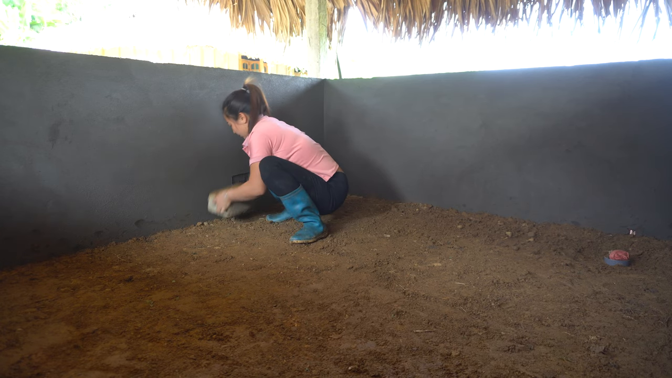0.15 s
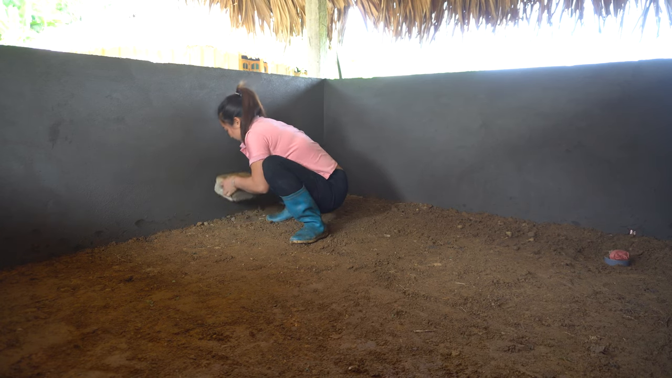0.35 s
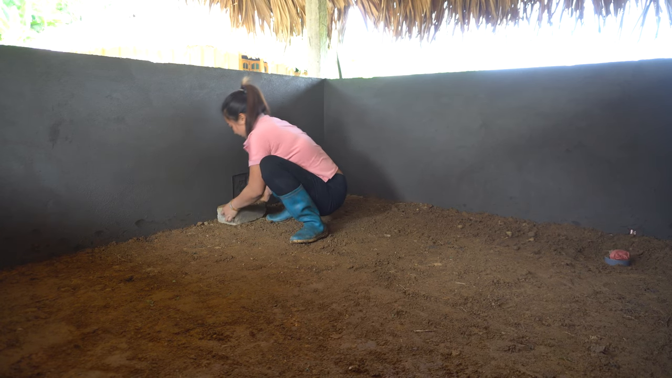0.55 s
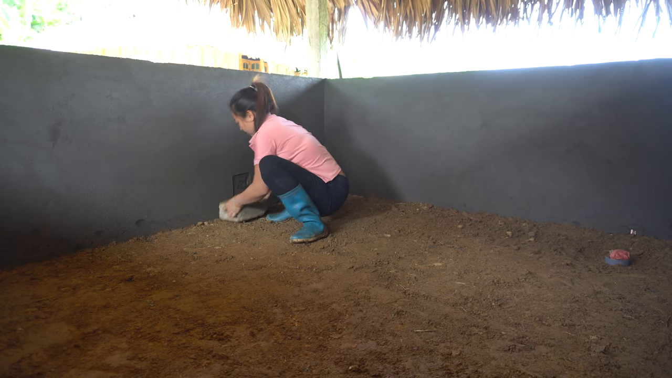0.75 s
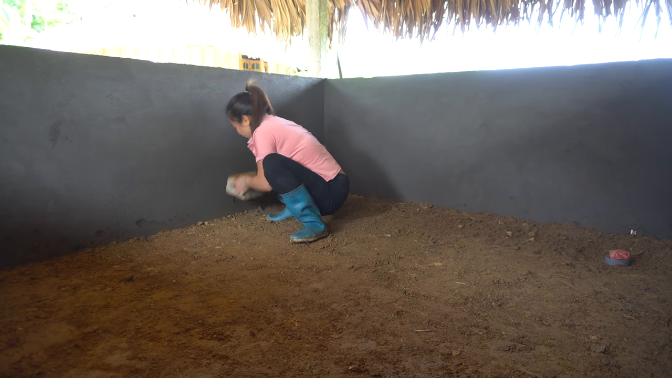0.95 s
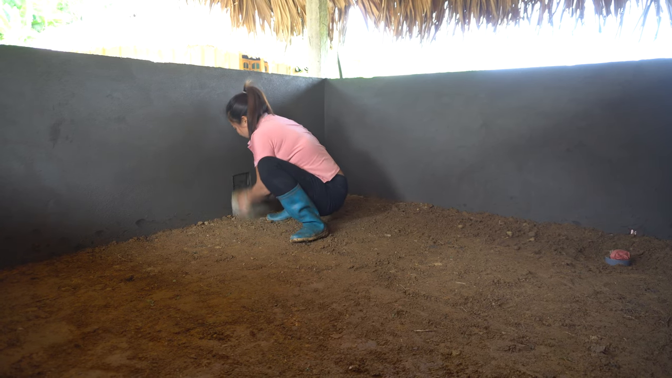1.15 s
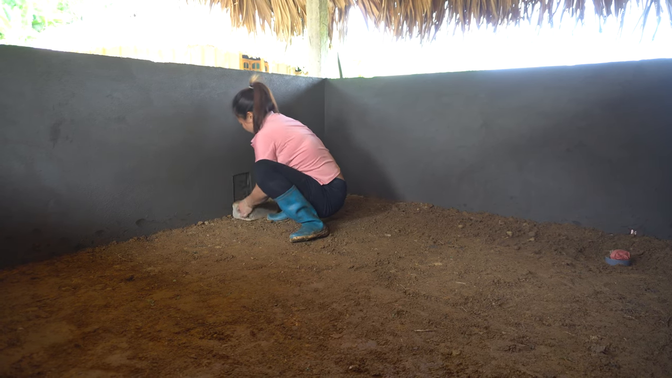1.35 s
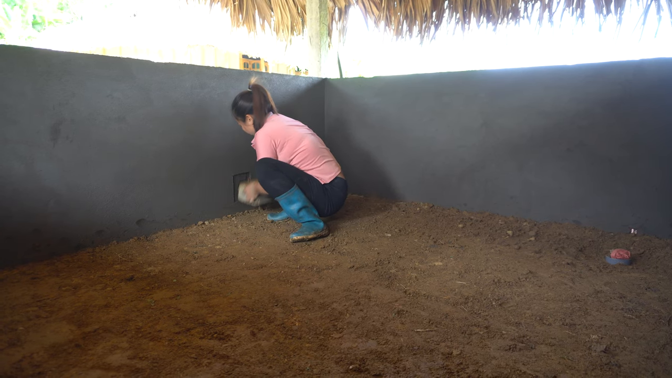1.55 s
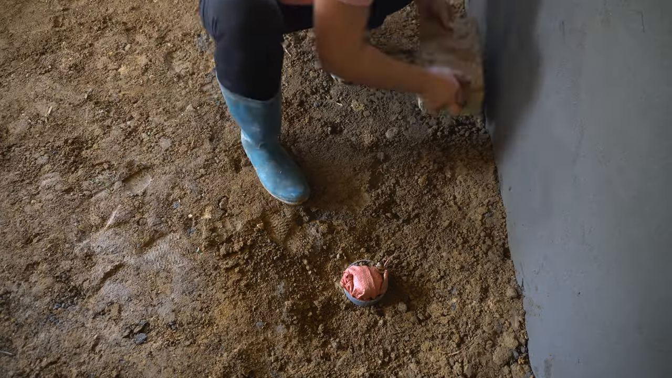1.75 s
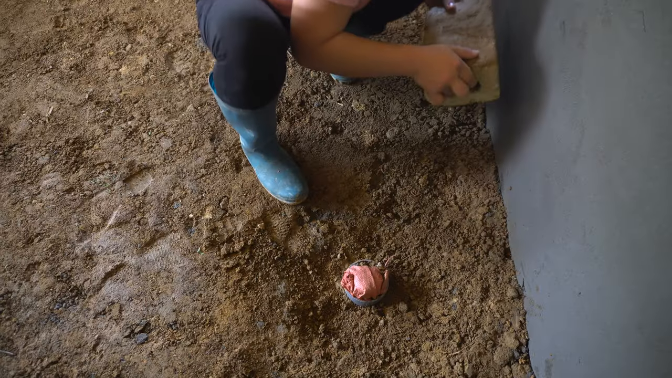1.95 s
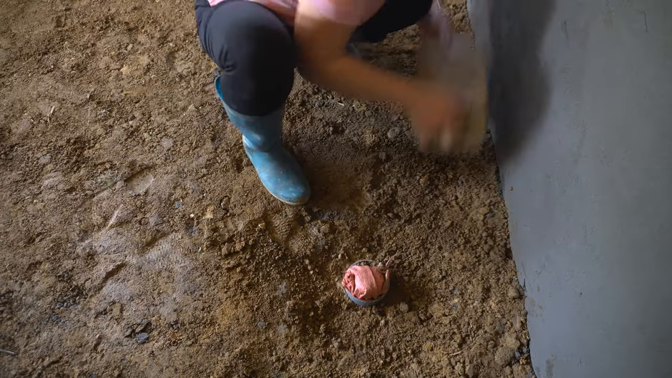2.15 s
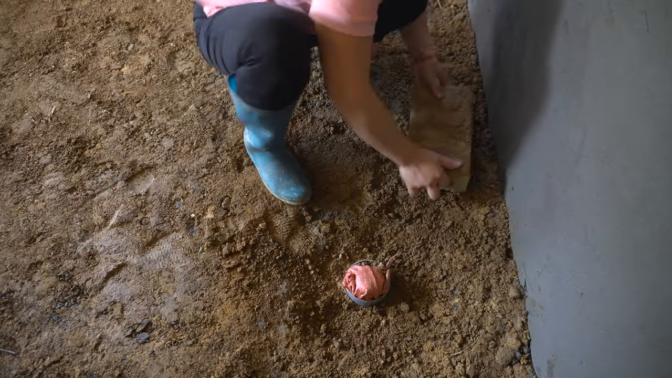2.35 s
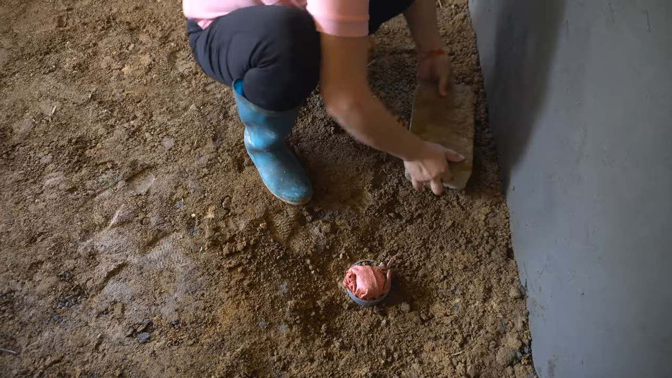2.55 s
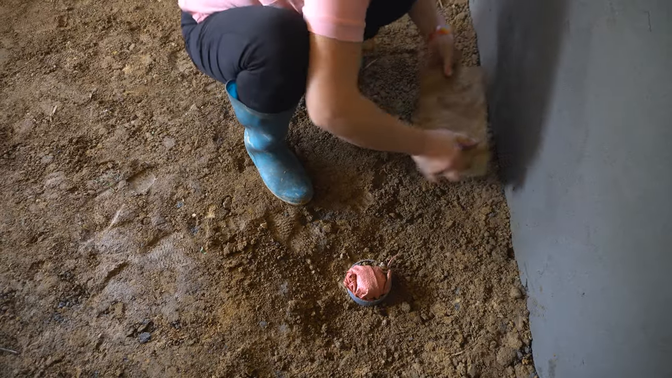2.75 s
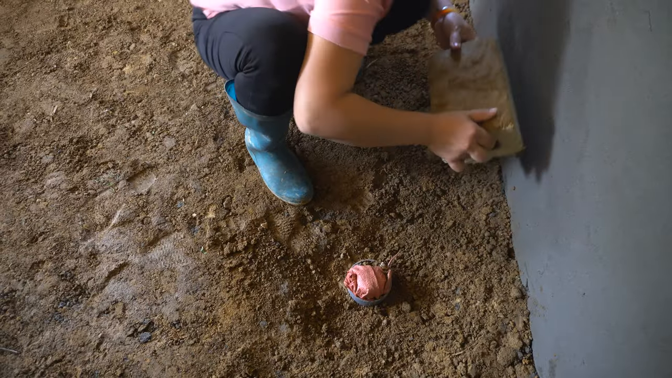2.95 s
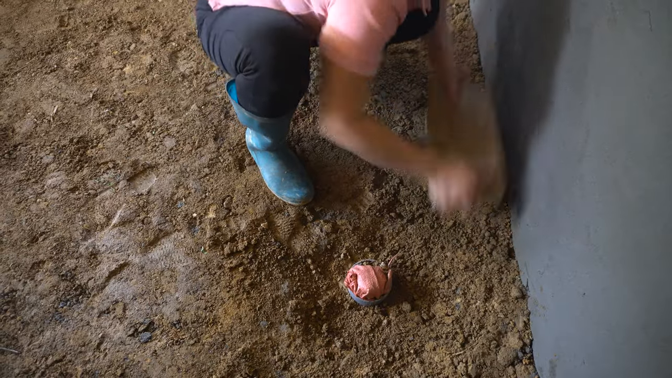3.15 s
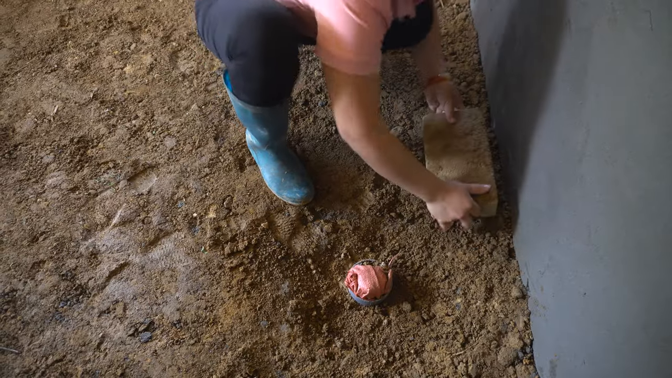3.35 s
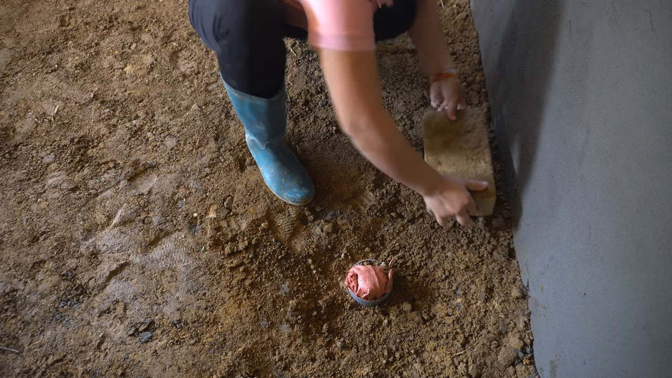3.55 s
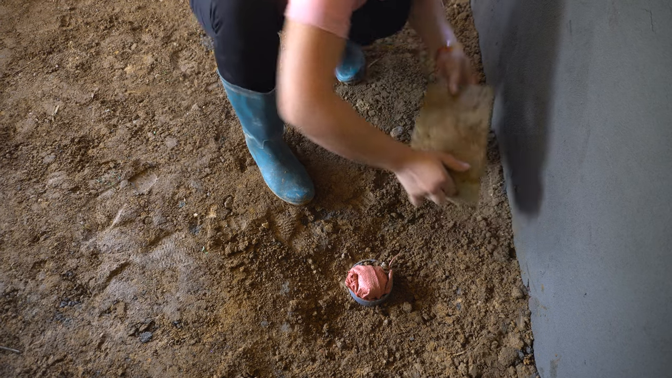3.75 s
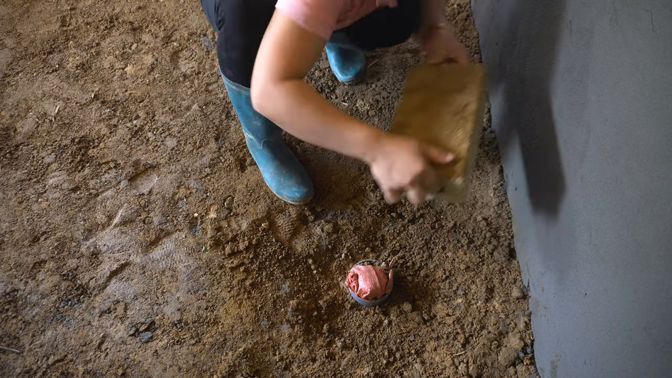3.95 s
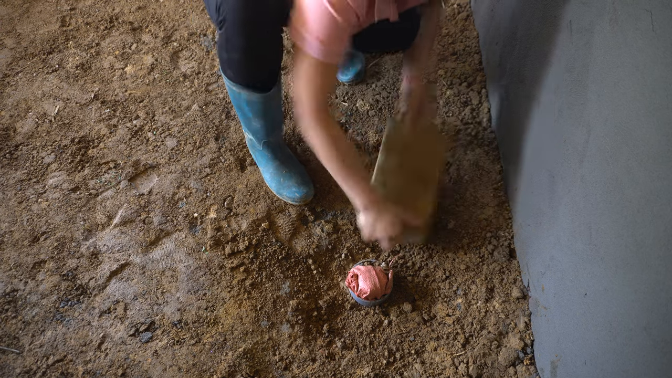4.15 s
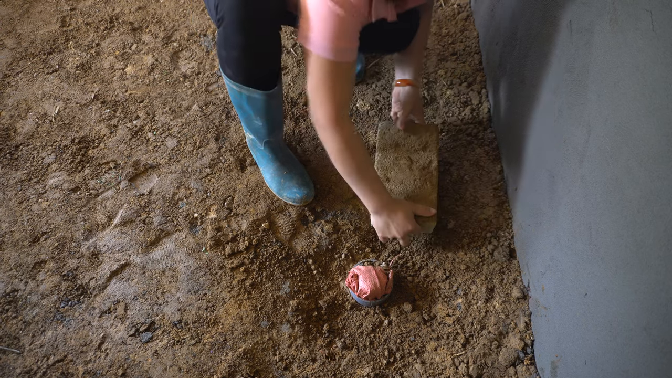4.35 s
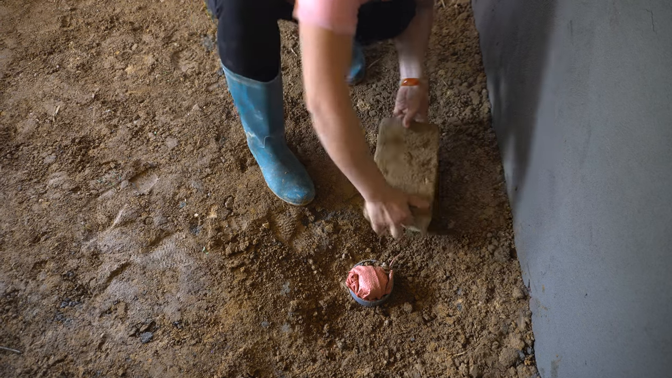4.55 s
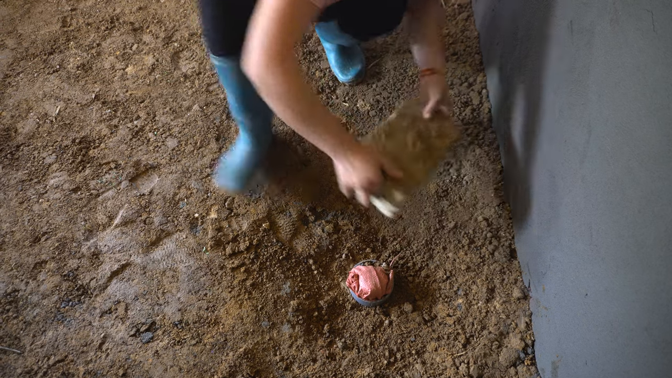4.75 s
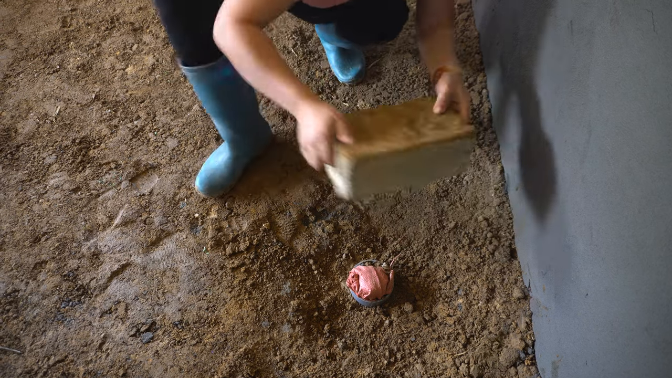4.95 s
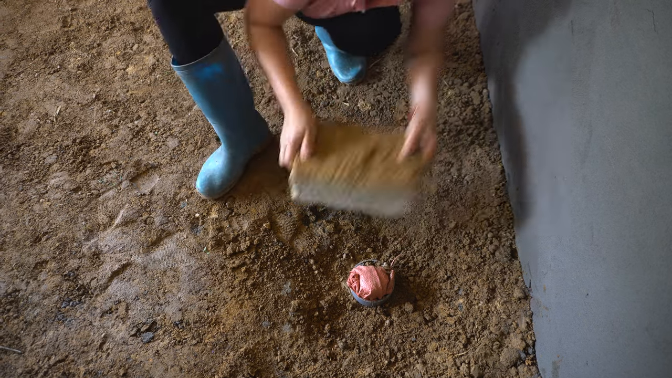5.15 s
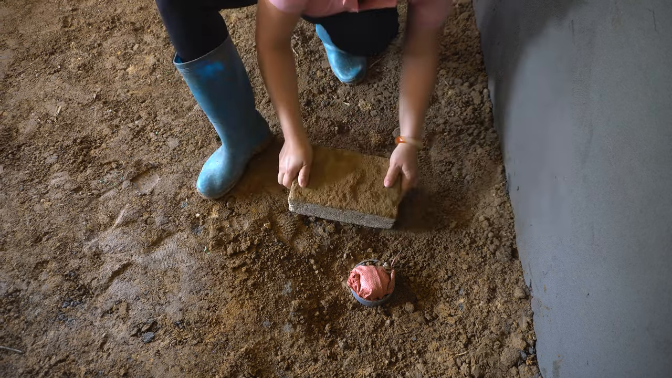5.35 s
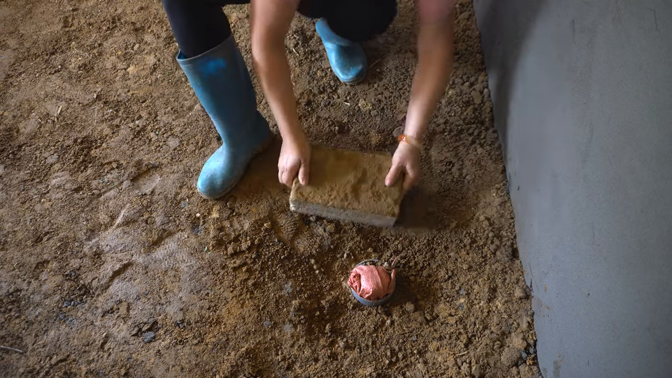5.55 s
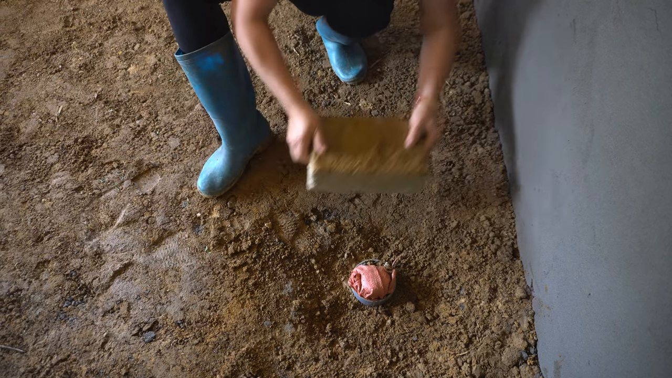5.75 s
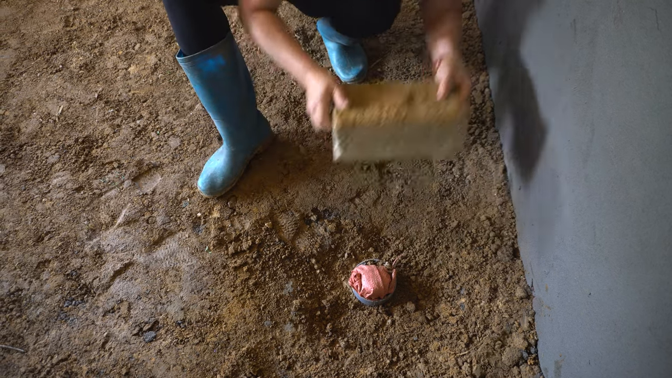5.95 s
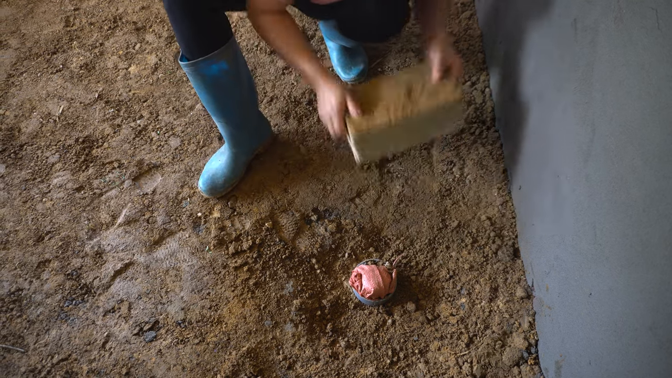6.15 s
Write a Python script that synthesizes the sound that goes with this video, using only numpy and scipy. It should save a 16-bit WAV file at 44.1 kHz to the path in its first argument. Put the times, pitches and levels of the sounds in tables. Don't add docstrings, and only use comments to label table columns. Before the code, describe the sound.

Slow, steady thumps of a brick on loose soil: two from farther off, with a strong low boom, then a split-second dropout and four heard closer, with knocks, crushed grit and short hollow ringing. Crumbs and earth rustle between blows. Quiet outdoor hiss, thin insect chirps and faint bird notes lie behind, with low wind gusts bumping the stereo microphone.

```python
import sys
import numpy as np
from scipy import signal
from scipy.fft import rfft, irfft, next_fast_len
from scipy.io import wavfile
from scipy.ndimage import uniform_filter1d

SR = 44100
rng = np.random.default_rng(int(sys.argv[2]) if len(sys.argv) > 2 else 0)


def pcm_store(signal):
    levels = np.round(np.clip(np.atleast_2d(signal), -1, 1) * 32767)
    wavfile.write(sys.argv[1], SR, levels.astype(np.int16).T)


def decibels_to_gain(level_db):
    exponent = np.asarray(level_db, float) / 20
    return 10 ** exponent


N = 277367


def evened(x):
    return x / np.sqrt(np.mean(x ** 2) + 1e-20)


def read(points, hz):
    f, value = np.transpose(points)
    return np.interp(np.log(hz + 1), np.log(f + 1), value)


def add(mix, s, sound):
    part = mix[..., round(s * SR):][..., :sound.shape[-1]]
    part += sound[..., :part.shape[-1]]


def band(x, lo_hz, hi_hz, order=2):
    return signal.sosfilt(signal.butter(order, [lo_hz, hi_hz], "band", fs=SR, output="sos"), x)


def panned(x, db):
    return x * decibels_to_gain(np.array([[db / 2], [-db / 2]]))


def swells(rows, column, skew, power):
    t, energy = np.arange(N) / SR, np.zeros(N)
    for row in rows:
        u = np.clip((t - row[0]) / row[1], 0, 1)
        arch = abs(np.sin(np.pi * u ** skew)) ** power
        energy += (decibels_to_gain(row[column]) * arch) ** 2 * (u < 1)
    return np.sqrt(energy)


def noise(spectrum, same, patchy_db):
    frames, hz = N // 256 + 5, np.fft.rfftfreq(1024, 1 / SR)
    a, b, c, d, patches = rng.standard_normal((frames, 513, 5)).T
    patches = uniform_filter1d(patches, size=10, axis=0)
    patches = evened(uniform_filter1d(patches, size=12, axis=1))
    like = np.clip(same(hz), 0, 1)[:, None]
    left = a + 1j * b
    right = like * left + np.sqrt(1 - like ** 2) * (c + 1j * d)
    gain = decibels_to_gain(read(spectrum, hz)[:, None] + patchy_db * patches)
    return signal.istft(np.array([left, right]) * gain, nperseg=1024, noverlap=768)[1][:, :N]


# start_s, end_s
CUT = (1.788, 1.8285)
SILENCE_START_S, SILENCE_END_S = CUT


def by_place(far, near):
    return np.where(np.arange(N) < SILENCE_END_S * SR, far, near)


# freq_hz, density_db
AIR_FAR = [(15, -23), (25, 2), (48, -7.5), (123, 2), (175, -15.5), (277, -11.5), (427, -17.5), (840, -14),
           (1040, -21), (1260, -17), (3620, -18), (12500, -29), (16000, -38)]
AIR_NEAR = [(15, -41), (25, 14), (59, -7.5), (108, 7), (190, -8.5), (263, -0.5), (416, -8), (575, -5),
            (936, -9.5), (2690, -12.5), (12900, -24.5), (14800, -27), (16000, -32)]
# freq_hz, likeness (0 to 1)
AIR_LIKENESS = [(60, 1), (150, 0.94), (380, 0.65), (950, 0.37), (2380, 0.45), (5980, 0.019), (15000, 0.19)]


def air():
    places = []
    for spectrum, level_db in (AIR_FAR, -54.5), (AIR_NEAR, -55):
        wash = noise(spectrum, lambda hz: read(AIR_LIKENESS, hz), patchy_db=-2.0)
        places.append(decibels_to_gain(level_db) * wash / band(wash, 300, 16000).std())
    return by_place(*places)


# freq_hz, density_db
WIND = [(12, -37), (20, -19), (54, 19), (103, 3), (173, -4.5), (240, -9.5), (410, -39), (700, -54),
        (910, -85), (1540, -120)]
# start_s, length_s, level_db
GUSTS = [(-.05, 0.18, -49), (.245, 0.23, -36), (.445, 0.11, -38), (.77, 0.25, -36.5), (1., 0.35, -59),
         (1.4, 0.33, -50), (1.64, 0.16, -44.5), (3.4, 0.4, -51), (3.89, 0.064, -49), (4.5, 0.45, -50),
         (4.9, 0.077, -27.5), (4.97, 0.13, -22.5), (5.08, 0.13, -18.5), (5.19, 0.25, -29.5),
         (5.4, 0.18, -47), (5.54, 0.085, -40), (5.6, 0.23, -45.5), (5.84, 0.12, -42), (6.1, 0.2, -38.5),
         (6.16, 0.15, -28.5), (6.26, 0.22, -23.5)]
# start_s, peak_db, pitch_hz, left_minus_right_db
EDDIES = [(0.388, -29.5, 79.4, -6), (0.468, -34, 70.5, -8), (4.899, -23, 96, -4), (4.992, -24, 152, -1),
          (5.014, -23, 102, -1), (5.026, -21, 249, 1), (4.933, -32, 79.4, -10), (5.035, -25.5, 105, 2),
          (5.073, -28.5, 148, -3), (5.107, -20, 116, -2), (5.124, -34, 151, 0), (5.096, -25.5, 240, 4),
          (5.068, -38, 350, 0), (5.132, -26, 248, 0), (5.162, -23.5, 190, 4), (5.141, -18.5, 111, 3),
          (5.159, -18, 87.6, -5), (5.247, -36, 73, -1), (5.557, -31.5, 150, 6.5), (6.196, -21, 73, -5),
          (6.233, -24, 95, 2)]


def wind():
    rumble = noise(WIND, lambda hz: 1 - (hz / 260) ** 2.0, patchy_db=-1.0)
    rumble = band(rumble, 43.4, 950, order=3)
    lumps = np.tanh(evened(band(rng.standard_normal(N), 9.4, 53)))
    gusts = swells(GUSTS, -1, skew=0.7, power=0.93)
    out = evened(rumble * decibels_to_gain(4.3 * lumps)) * gusts * decibels_to_gain(-6.0)
    crest = 0.17
    for s, db, hz, pan_db in EDDIES:
        turns = np.arange(0, 2.4, hz / SR)
        eddy = -np.sin(2 * np.pi * turns) * np.sin(np.pi * turns / 2.4) ** 2
        eddy = eddy * (1 - crest + crest * abs(eddy) ** 3)
        add(out, s - .004, panned(decibels_to_gain(db) * eddy, pan_db))
        slope = np.gradient(eddy)
        add(out, s, decibels_to_gain(db - 9.5) * np.outer([1, -1], slope / slope.max()))
    return out


def chirps(trills, count, strokes, gain_db, climb_hz, sag):
    out, t = np.zeros(N), np.arange(0, count / strokes, 1 / SR)
    stroke, within = np.divmod(t * strokes, 1)
    before = count - 1 - stroke
    for s, end, db, hz, rate in trills:
        pitch = (hz - climb_hz * before) * (1 + sag * (.5 - within))
        for start in np.arange(s, end - .03, 1 / rate):
            chance = rng.standard_normal(8)
            uneven_db = 1.2 * chance[stroke.astype(int)] + 1.1 * chance[-1]
            turns = np.cumsum(pitch * (1 + .004 * chance[-2])) / SR
            wing = np.sin(np.pi * within) ** 1.8 * np.sin(2 * np.pi * turns)
            add(out, start, decibels_to_gain(db - gain_db * before + uneven_db) * wing)
    return out


# strokes_per_chirp, strokes_per_s, gain_per_stroke_db, climb_per_stroke_hz, sag_share
HIGH_WING = (3, 66, 5, 70, .07)
LOW_WING = (1, 20, 0, 0, -.008)
# start_s, end_s, level_db, pitch_hz, chirps_per_s
HIGH_TRILLS = [(1.877, 2.07, -56, 4890, 23.), (2.847, 3.41, -57.5, 4890, 22.3),
               (3.841, 4.51, -57.5, 4890, 21.8), (5.072, 5.54, -57, 4870, 22.2),
               (6.08, 6.29, -56, 4800, 22.)]
LOW_TRILLS = [(.01, .08, -56, 4200, 17.), (1.004, 1.4, -57.5, 4190, 17.2), (3.218, 3.56, -59.5, 4170, 18.),
              (4.632, 4.96, -58, 4150, 17.), (5.93, 6.26, -58, 4150, 17.)]


def crickets():
    return chirps(HIGH_TRILLS, *HIGH_WING) + chirps(LOW_TRILLS, *LOW_WING)


def glides(notes, blur):
    out, wobble = np.zeros(N), evened(band(rng.standard_normal(N), 40, 300))
    for s, end, start_hz, end_hz, db in notes:
        t = np.arange(s, end, 1 / SR)
        hz = np.linspace(start_hz, end_hz, len(t)) * (1 + blur * wobble[round(s * SR):][:len(t)])
        tone = np.sin(2 * np.pi * np.cumsum(hz) / SR)
        add(out, s, decibels_to_gain(db - 1.0) * tone * signal.windows.tukey(len(t), .4))
    return out


# start_s, end_s, start_hz, end_hz, level_db
WHISTLES = [
    (1.826, 1.885, 4250, 4650, -53),
    (4.16, 4.245, 3850, 4500, -54),
    (4.0, 4.1, 2550, 2900, -62),
    (.52, .615, 5950, 5880, -58),
]
COOS = [
    (2.57, 2.83, 259, 251.5, -54.5),
    (3.55, 3.92, 269, 254.6, -63),
    (4.74, 4.9, 257, 260, -58),
]


def birds():
    return glides(WHISTLES, .05) + glides(COOS, .015)


# start_s, length_s, coarse_db, fine_db
RUSTLE = [(.75, 1, -62.5, -78), (1.6, 0.6, -59, -71), (2.1, 0.59, -83, -65.5), (2.3, 0.3, -68, -61.5),
          (2.41, 0.41, -60, -62), (2.77, 0.37, -52.5, -62.5), (3.02, 0.44, -63, -65), (3.1, 0.15, -75, -58),
          (3.3, 0.24, -76, -65), (3.55, 0.18, -61, -70), (3.7, 0.21, -50.5, -64), (3.98, .16, -72, -74),
          (4.04, 0.3, -57, -58.5), (4.24, 0.29, -52, -60), (4.4, 0.62, -56.5, -64),
          (4.7, 0.44, -54.5, -60.5), (4.88, 0.18, -50.5, -62), (4.94, 0.47, -60, -63.5),
          (5.18, 0.52, -59, -68), (5.38, 0.93, -56.5, -65.5), (5.82, 0.21, -48, -66), (5.9, 0.74, -54, -64),
          (6.26, 0.17, -51.5, -64)]


def rustle():
    grains = rng.standard_normal((N, 3)).T * decibels_to_gain(3.35 * np.minimum(rng.exponential(1, N), 6))
    grains = 0.69 * grains[0] + grains[1:]
    coarse, fine = evened(band(grains, 880, 7400)), evened(band(grains, 5560, 13700))
    coarse_gain, fine_gain = [swells(RUSTLE, k, skew=0.55, power=2.1) for k in (2, 3)]
    return coarse * coarse_gain + fine * fine_gain


# low_hz, high_hz
CRUMB_BANDS = [(1300, 2500), (3500, 5300), (5500, 15500)]
# start_s, dull_peak_db, crunch_peak_db, fizz_peak_db
CRUMBS = [(1.536, -40, -34, -33), (2.029, -57, -52, -58), (2.356, -48, -50, -50), (2.434, -56, -48, -52),
          (2.554, -53, -47, -46), (3.107, -65, -52, -52), (4.297, -38, -44, -46), (4.366, -55, -52, -50),
          (4.584, -42, -42, -33), (4.917, -54, -42, -50), (5.074, -57, -52, -52), (6.113, -50, -46, -48)]


def crumbs():
    out, ticks = np.zeros((2, N)), np.zeros(600)
    ticks[[0, 9, 23, 40, 70, 110]] = .7, -1, .6, -.5, .3, -.2
    layers = [band(ticks, lo, hi) for lo, hi in CRUMB_BANDS]
    for (s, *levels), pan_db in zip(CRUMBS, rng.uniform(-4, 4, len(CRUMBS))):
        crumb = sum(decibels_to_gain(db) * x / abs(x).max() for db, x in zip(levels, layers))
        add(out, s, panned(crumb, pan_db))
    return out


# freq_hz, t60_s
PEN_DECAY = [(125, 1), (400, 0.32), (900, 0.21), (2000, 0.15), (5000, 0.13), (12000, 0.14)]


def pen(x):
    taps = np.zeros((3, SR // 2))
    grid = np.arange(200, SR // 2 - 20, 20)
    at = grid + rng.integers(0, 20, (3, len(grid)))
    np.put_along_axis(taps, at, rng.choice([-1., 1.], at.shape), 1)
    hz, t, z = signal.stft(taps[0] + .5 * taps[1:], SR, nperseg=256)
    t60 = read(PEN_DECAY, hz)[:, None]
    z = z * decibels_to_gain(-60 * t / t60)
    z = z * np.sqrt(t60) / np.linalg.norm(z, axis=2, keepdims=True)
    tail = signal.istft(z, SR, nperseg=256)[1]
    return signal.fftconvolve(x, tail / np.linalg.norm(tail[0]), axes=1)[:, :N]


# start_s, clod_db, knock_db, fizz_db, length_ms
GRIT = [(0.5168, -28, -52, -43, 14), (0.526, -45, -52, -52, 9.6), (1.2085, -51, -51, -46, 4.3),
        (1.2135, -36.5, -37.5, -46, 5.5), (2.2806, -50, -25.5, -27, 4.8), (2.291, -58, -22.5, -41, 1.9),
        (2.298, -50, -46, -61, 9), (3.244, -57, -29, -61, 2.7), (3.2514, -24.5, -75, -37, 4.1),
        (3.256, -46, -49, -51, 7.4), (4.226, -41.5, -40.5, -33, 17.6), (4.297, -38, -47, -51, 4.3),
        (4.316, -52, -45, -54, 11), (4.333, -63, -44, -68, 6.5), (5.2935, -34, -59, -28.5, 3.9),
        (5.297, -46, -22.5, -69, 3.5), (5.305, -32, -50, -55, 3.9)]


def grit():
    out, t = np.zeros((2, N)), np.arange(6000) / SR
    for s, clod_db, knock_db, fizz_db, ms in GRIT:
        crunch_db = (knock_db + fizz_db) / 2 + (14.5 if s < SILENCE_START_S else 1.5)
        length = ms * 1e-3
        fade = np.exp(-(t / length) ** 2) + 0.63 * np.exp(-t / (1.8 * length))
        shape = (1 - np.exp(-t / (0.22 * length))) * fade
        grains = rng.standard_normal((6000, 3)).T * decibels_to_gain(0.97 * rng.exponential(1, 6000))
        shared, left, right = signal.lfilter([1], [1, -.55], grains)
        apart = np.array([left, right])
        # level_db, low_hz, high_hz, width, filter order
        layers = [(clod_db, 500, 950, .4, 1), (knock_db, 950, 1900, .6, 1),
                  (crunch_db, 2000, 4300, 1.6, 1), (fizz_db, 5000, 14500, 3.5, 2)]
        cracks = sum(decibels_to_gain(db - 3.5) * evened(band(shared + width * apart, lo, hi, order))
                     for db, lo, hi, width, order in layers)
        add(out, s - .0005, cracks * shape)
    return out


# start_s, signed_peak, length_ms
SLAPS = [(.5185, -.05, 4.5), (.5222, .04, .6), (1.211, -.12, 2.5), (1.2143, .04, 2.), (1.217, -.16, 1.8),
         (2.2813, -.2, 1.2), (2.2832, -.15, .8), (2.2853, .3, 3.5), (2.2885, -.17, 1.2), (2.2915, -.22, .6),
         (3.2447, -.19, .9), (3.2483, .28, 2.), (3.252, -.3, 1.), (3.2525, .1, 3.), (3.2588, -.12, 1.3),
         (3.284, -.04, 4.), (3.309, -.07, 5.), (3.3195, -.04, 4.), (4.229, -.07, 2.), (4.2335, .05, 1.5),
         (5.295, -.09, 2.5), (5.297, -.15, 2.), (5.299, .03, 1.), (5.3005, -.06, 1.5), (5.3035, .1, 3.5),
         (5.334, -.07, 3.), (5.3385, .05, 1.5), (5.3525, -.05, 2.5), (5.384, -.07, 2.2), (5.403, -.07, 2.6)]


def slaps():
    out = np.zeros(N)
    for s, peak, ms in SLAPS:
        u = np.arange(-.008, .008, 1 / SR) / (ms * 1e-3 / 2.4)
        add(out, s - .008, peak * (1 - .4 * u ** 2) * np.exp(-u ** 2 / 2))
    return out


# start_s, pitch_hz, level_db, t60_s
KNOCKS = [(.519, 752, -17.5, 0.03), (0.518, 1570, -25, 0.038), (.526, 1115, -30, 0.026),
          (.5435, 750, -23, 0.03), (1.211, 790, -20.5, 0.042), (1.211, 1630, -29.5, 0.036),
          (1.2147, 2430, -29, 0.027), (1.2275, 2180, -32, 0.029), (1.216, 273, -25, 0.12),
          (2.2806, 560, -25, 0.033), (2.29, 1400, -23, 0.026), (2.2885, 560, -39, 0.018),
          (2.296, 1115, -28, 0.036), (2.306, 1780, -36, 0.044), (3.246, 688, -19, 0.032),
          (3.246, 1150, -31, 0.099), (3.258, 1670, -42, 0.032), (4.23, 286, -26.5, 0.11),
          (4.314, 804, -40, 0.036), (4.334, 1320, -44, .05), (5.295, 903, -29, 0.056),
          (5.297, 376, -19, 0.07),
          (.5195, 3100, -28.5, 0.018), (.529, 1990, -32, .03), (.538, 518, -27.5, 0.06),
                (.551, 1614, -41, .03), (.572, 430, -39, .08), (.583, 695, -38, .07),
                (1.2145, 1950, -30, .025), (1.2165, 2800, -33, .025), (1.231, 405, -33, .07),
                (1.246, 540, -35, 0.062), (1.246, 690, -40, .06), (1.266, 420, -40, 0.068),
                (1.285, 405, -34, .08), (1.325, 438, -45, .08), (2.2845, 2580, -33, .02),
                (2.307, 1350, -36, .03), (2.313, 1400, -35, .03), (2.33, 495, -39, .07),
                (2.343, 1000, -40, .03), (3.2445, 1990, -35, .02), (3.259, 1660, -34, .03),
                (3.285, 710, -33, .06), (3.33, 360, -37, 0.069), (4.229, 750, -43, .05),
                (4.232, 910, -35, 0.064), (4.243, 1420, -39, 0.034), (4.243, 515, -42, 0.037),
                (5.308, 1200, -34, .05), (5.319, 710, -42, .06), (5.331, 923, -31.5, .07),
                (5.336, 560, -30, .06), (5.357, 1060, -42, .04), (5.362, 477, -34, 0.077),
                (5.375, 270, -36, .1), (5.4, 259, -34, .1), (5.39, 540, -38, .07), (1.2165, 420, -27, .06),
                (3.278, 1205, -41, .05), (3.3, 1350, -44, .04), (3.318, 190, -33, .08)]


def knocks():
    out, t = np.zeros(N), np.arange(SR // 5) / SR
    for s, hz, db, t60 in KNOCKS:
        swell = 1 - np.exp(-(t * hz / 0.97) ** 2)
        add(out, s, decibels_to_gain(db - 60 * t / t60) * swell * -np.sin(2 * np.pi * hz * t))
    return out


# start_s, tones_db, thud_db, thud_centre_hz
RINGING = [
    (0.524, -31, -40.5, 584),
    (1.212, -21, -34, 385),
    (2.289, -22.5, -43, 420),
    (3.25, -30, -37, 325),
    (4.232, -28.5, -41, 297),
    (5.297, -32.5, -26, 260),
]
CRUMBLE_DB = [-44, -44, -43, -49, -46, -44]


def thuds():
    out, t = np.zeros((2, N)), np.arange(SR // 2) / SR
    spread, thud_t60_s, crumble_t60_s = 1.7, .4, .28
    for (s, _, db, hz), crumble_db in zip(RINGING, CRUMBLE_DB):
        shared, left, right = rng.standard_normal((len(t), 3)).T
        apart = np.array([left, right])
        roar = evened(band(shared + .45 * apart, hz / spread, hz * spread))
        add(out, s, decibels_to_gain(db - 60 * t / thud_t60_s) * (1 - np.exp(-t / 0.015)) * roar)
        crumble = evened(band(shared + apart, 540, 2700))
        add(out, s, decibels_to_gain(crumble_db - 60 * t / crumble_t60_s) * (1 - np.exp(-t / .012)) * crumble)
    return out


# pitch_hz, level_db, t60_s
TONES = [
    [(270, -9.5, 0.51), (495, -14, 0.43), (634, -6, 0.14), (726, -7, 0.24), (810, -0.5, 0.17),
     (894, -14, 0.12), (1150, -12, 0.11), (1604, -12, 0.077), (1770, -33, 0.37), (2180, -30, 3.9),
     (2430, -4, 0.076)],
    [(344, -2, 0.1), (420, -7, 0.28), (473, -12.5, 0.33), (535, -15, 0.3), (647, -29, 0.3), (746, -9, 0.1),
     (1540, -44, 0.32), (2140, -27, 0.16), (2150, -37, 0.32), (2410, -23, 0.15)],
    [(240, -2, 0.13), (313, -24, 0.5), (385, -45, 0.63), (470, -24.5, 0.59), (870, -28, 0.24),
     (1000, -19, 0.19), (1130, -28, 0.14), (1245, -18, 0.19), (1240, -3.5, 0.048), (1470, -7.5, 0.11),
     (1670, -26, 0.22)],
    [(188.9, 1, 0.45), (203.2, 1, .35), (241, -3, 0.45), (339, -13.5, 0.59), (365, -14, 1.1),
     (420, -6, 0.21), (479, -1, 0.2), (531, -7, 0.35), (576, 4, 0.079), (706, -10.5, 0.32),
     (740, -18, 0.22), (1040, -11, 0.19), (1215, -16, 0.17)],
    [(244, -2.5, 5.0), (515, 0.5, 0.048), (680, -16, 0.042), (1085, -16, 0.12), (1240, -23, 0.2),
     (1340, -23, 0.077), (1470, -28, 0.077)],
    [(252, 6.5, 0.36), (323.5, 6.5, 0.45), (420, -3.5, 0.49), (473, 1, 0.38), (533, -9, 0.52),
     (788, -12, 0.22), (933, -7, 0.25), (1080, -24, 0.39), (1035, -21, 0.5)],
]


def tones():
    out, t = np.zeros(N), np.arange(SR) / SR
    longest_t60_s, usual_t60_s = .65, .3
    for (s, blow_db, *_), waves in zip(RINGING, TONES):
        for (hz, db, t60), turn in zip(waves, rng.random(16)):
            swell = 1 - np.exp(-t * hz / .9)
            fade_db = -60 * t / (t60 if t60 < longest_t60_s else usual_t60_s)
            add(out, s, decibels_to_gain(blow_db + db + fade_db) * swell * np.sin(2 * np.pi * (hz * t + turn)))
    return out


# pitch_hz, t60_s
WAVES_FAR = [(55, .5), (79, .21), (104, .34), (120, .35), (155, .2), (201.5, .34)]
WAVES_NEAR = [(57, .4), (84, .2), (100.5, .35), (119.5, .27), (162, .24), (203, .28)]
# start_s, signed_amplitude x 4
BOOMS = [
    (.5206, .144, .438, -.22, .061),
    (1.2124, .119, .367, -.213, .114),
    (2.2864, -.064, -.058, -.093, .043),
    (3.252, .05, .055, .065, -.06),
    (4.2306, .147, .171, .114, -.03),
    (5.296, .165, .145, .114, -.06),
]


def booms():
    out, t = np.zeros(N), np.arange(SR) / SR
    push = 1 - np.exp(-(t / .001) ** 2)
    for s, *drive in BOOMS:
        drives = [-0.17 * drive[1]] + drive + [0.63 * drive[3]]
        waves = WAVES_FAR if s < SILENCE_START_S else WAVES_NEAR
        ringing = sum(a * decibels_to_gain(-60 * t / t60) * np.sin(2 * np.pi * hz * t)
                      for a, (hz, t60) in zip(drives, waves))
        add(out, s, push * ringing)
    return out


# freq_hz, phase_rad
LATE_FAR = [(25, .1), (100, .28), (200, .38), (450, .35), (900, .65), (1800, .5), (3500, .1), (9000, .6)]
LATE_NEAR = [(25, .03), (100, .13), (200, .21), (450, .34), (900, .45), (1800, .36), (3500, .45),
             (9000, 1.1)]
# freq_hz, left_minus_right_db
LEAN_FAR = [(300, -.3), (900, 1.4), (1800, 0), (5000, 2.5)]
LEAN_NEAR = [(200, -.3), (900, -1.5), (2500, -2.2), (9000, -1)]


def ports(x):
    size = next_fast_len(N)
    hz = np.fft.rfftfreq(size, 1 / SR)
    half = np.array([[.5], [-.5]])
    spectrum = rfft(x, size)
    places = []
    for late, lean in (LATE_FAR, LEAN_FAR), (LATE_NEAR, LEAN_NEAR):
        turned = spectrum * decibels_to_gain(half * read(lean, hz)) * np.exp(-1j * half * read(late, hz))
        places.append(irfft(turned, size)[:, :N])
    return by_place(*places)


def scene():
    background = air() + wind()
    outside = panned(crickets(), 0.77) + panned(birds(), .5)
    slap, crushed = slaps(), grit()
    echoes = pen(decibels_to_gain(-6.5) * crushed + decibels_to_gain(-13.5) * band(slap, 283, 8000))
    blows = booms() + tones() + knocks() + thuds() + slap + crushed + echoes
    return background + outside + rustle() + crumbs() + ports(blows)


def band_limit(x):
    return signal.sosfilt(signal.butter(12, 16520, fs=SR, output="sos"), x)


def record(dry):
    t = np.arange(N) / SR
    fade = np.exp(-(t - SILENCE_START_S) / .004) * .2
    first = np.clip(fade + (t < SILENCE_START_S), 0, 1)
    kept = np.where(t < SILENCE_END_S, first, 1)
    lowpass = signal.firwin(511, 15850, fs=SR)
    limited = signal.oaconvolve(dry * kept, lowpass[None], "same")
    return band_limit(limited)


dry = scene()
out = record(dry)
pcm_store(out)
```